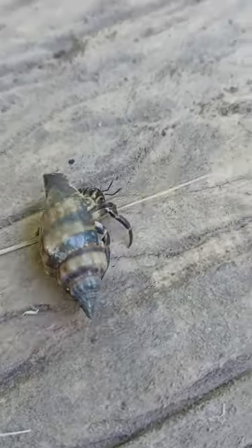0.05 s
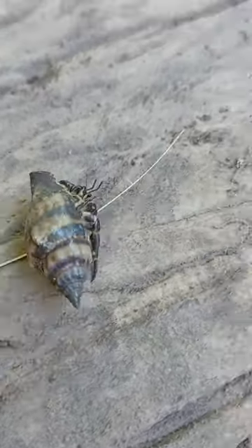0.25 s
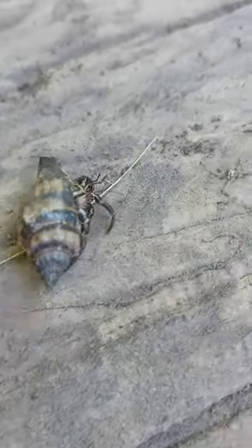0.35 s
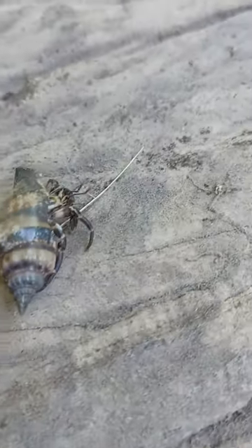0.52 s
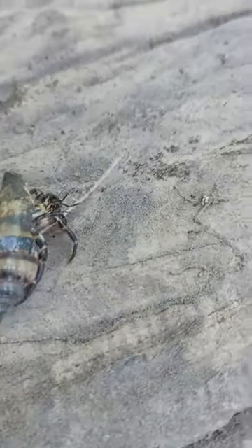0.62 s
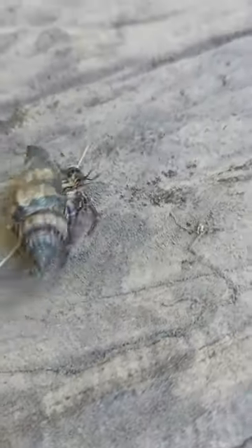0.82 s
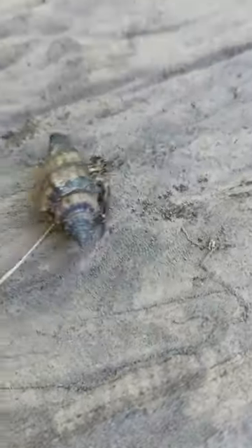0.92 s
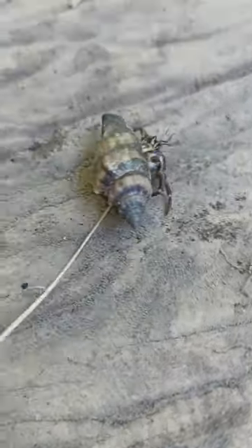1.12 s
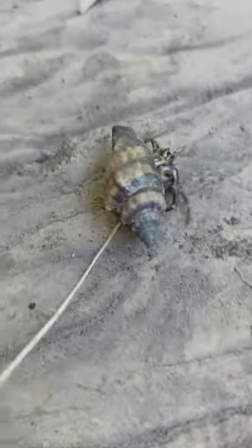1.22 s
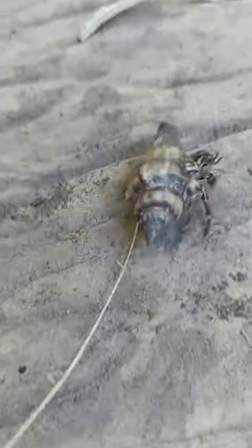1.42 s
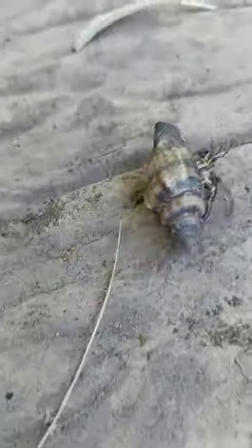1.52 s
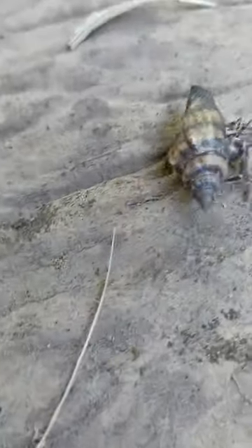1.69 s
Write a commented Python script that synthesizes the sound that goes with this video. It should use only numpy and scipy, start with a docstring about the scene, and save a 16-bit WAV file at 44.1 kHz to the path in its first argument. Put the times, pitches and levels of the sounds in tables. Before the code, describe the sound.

Two short, hollow knocks sound close by as a hermit crab's shell hits a hard surface, the second harder, followed by light ticks of its legs. Behind them are quiet outdoor air, a high insect hiss and faint, far chirps.

```python
"""Quiet outdoor air and a steady treble hiss of insects sound from the start, with three faint, far chirps. At
about 0.2 s a small crab's shell knocks on a hard, hollow-sounding surface close by: the impulse gives a short
thump with quick echoes and excites ringing modes and a dense dying ring. Near 0.8 s it knocks again, a little
louder and brighter, struck at another spot. From about 1.3 s its legs tick faintly."""
import sys
import numpy as np
from scipy.fft import rfft, irfft, next_fast_len
from scipy.io import wavfile
from scipy.ndimage import map_coordinates

SR = 44100
rng = np.random.default_rng(int(sys.argv[2]) if len(sys.argv) > 2 else 0)


def log_audio(samples):
    """Write samples as a 16-bit WAV file to the path given in sys.argv[1]."""
    # one column per channel
    frames = np.atleast_2d(samples).T
    # limit to full scale, then quantise
    limited = np.clip(frames, -1, 1)
    pcm = np.round(limited * 32767).astype(np.int16)
    wavfile.write(sys.argv[1], SR, pcm)


N = 77175


def amp(db):
    """Amplitude ratio of a level in decibels."""
    return 10 ** (np.asarray(db) / 20)


def unit(x):
    """Normalisation to rms 1."""
    return x / np.sqrt(np.mean(x ** 2) + 1e-20)


def along(points, hz):
    """Interpolation of (frequency, value) points on a logarithmic frequency axis."""
    frequencies, values = np.transpose(points)
    return np.interp(np.log(hz + 1), np.log(frequencies + 1), values)


def spectrum(points):
    """Spectral envelope: a gain curve through (frequency, level) points."""
    return lambda hz: amp(along(points, hz))


def since(start_s):
    """Seconds elapsed since an onset, zero before it."""
    return np.maximum(np.arange(N) / SR - start_s, 0)


def wobble(rate_hz):
    """Smooth random modulation: a spline through rate_hz random values a second."""
    return map_coordinates(rng.standard_normal(N // 10), [np.arange(N) * rate_hz / SR], mode="wrap")


def filtered(x, response):
    """Zero-phase filtering: the spectrum of x times a frequency response."""
    size = next_fast_len(N + SR // 2)
    return irfft(rfft(x, size) * response(np.fft.rfftfreq(size, 1 / SR)), size)[..., :N]


def pan(left_minus_right_db):
    """Interaural level difference as left and right gains."""
    return amp(np.array([[.5], [-.5]]) * left_minus_right_db)


def noise(gain, coherence=None):
    """Stereo noise of rms 1; the balance of mid and side sets its interaural coherence."""
    def mid_side_gains(hz):
        angle = np.arccos(np.clip(along(coherence, hz), -1, 1) if coherence else 0 * hz) / 2
        return gain(hz) * np.array([np.cos(angle), np.sin(angle)])
    mid, side = filtered(rng.standard_normal((2, N)), mid_side_gains)
    return unit(np.array([mid + side, mid - side]))


# Spectrum of the air: frequency_hz, relative_db
AIR_SPECTRUM = [(15, -63), (25, -46), (43, -31), (69, -2), (241, -1), (276, -4), (378, -7.5), (454, -8),
                (497, -8), (936, -15), (2070, -18), (2590, -16), (5600, -23), (7280, -57), (12300, -120)]
# Likeness of the air at the two ears: frequency_hz, coherence
AIR_COHERENCE = [(60, 0.55), (290, 0.42), (700, 0.21), (1500, 0)]


def air(level_db=-59.5, cutoff_hz=6200):
    """Ambient noise: a low-passed outdoor rumble and rush, partly coherent in the bass."""
    def gain(hz):
        return amp(along(AIR_SPECTRUM, np.minimum(hz, 5500))) / (1 + (hz / cutoff_hz) ** 8)
    return amp(level_db) * noise(gain, AIR_COHERENCE)


# Far calls: start_s, length_s, start_hz, end_hz, level_db
FAR_CALLS = [(.25, .17, 4050, 3700, -71), (1.21, .3, 4350, 2950, -70), (1.7, .1, 4150, 4100, -72)]


def chirps(width_hz=400):
    """Spectral broadening: falling tones times low-passed noise, heard as calls smeared by distance."""
    out = np.zeros((2, N))
    for start_s, length_s, start_hz, end_hz, level_db in FAR_CALLS:
        progress = np.minimum(since(start_s) / length_s, 1)
        pitch_hz = start_hz + (end_hz - start_hz) * progress
        tone = np.sin(2 * np.pi * np.cumsum(pitch_hz) / SR)
        smear = noise(lambda hz: np.exp(-(hz / width_hz) ** 2))
        out += amp(level_db) * np.sin(np.pi * progress) * unit(tone * smear)
    return out


# Hiss of the far insect chorus: frequency_hz, relative_db
CHORUS_SPECTRUM = [(4000, -44), (6000, -7.5), (7000, -4.5), (9500, 1), (10200, -2.5), (10750, -8.5),
                   (11200, -8), (12300, -3.5), (14000, -10), (15700, -13)]
# Stereo balance of the chorus: frequency_hz, left_minus_right_db
CHORUS_PAN = [(7000, -6), (9000, -3), (10200, 9.5), (11500, 13.5), (15000, 9.5)]
# Single insect voices: pitch_hz, width_hz, relative_db, left_minus_right_db
INSECT_VOICES = [(6745, 150, -64, -3), (7600, 160, -65, -7), (7950, 140, -65.5, -5), (8450, 220, -69, -2),
                 (8830, 230, -63, -2), (9200, 180, -68, 2)]


def insects(chorus_db=-61, voices_db=-.5, core_width_hz=30.4, core_db=-5, flutter_db=-.5):
    """Amplitude modulation: narrow noise bands, each with a purer core, flutter over a broad chorus."""
    def band(pitch_hz, width_hz):
        return noise(lambda hz: 1 / (1 + 2 * ((hz - pitch_hz) / width_hz) ** 2))
    chorus = filtered(noise(spectrum(CHORUS_SPECTRUM)), lambda hz: pan(along(CHORUS_PAN, hz)))
    out = amp(chorus_db) * unit(chorus)
    for pitch_hz, width_hz, relative_db, pan_db in INSECT_VOICES:
        voice = unit(band(pitch_hz, width_hz) + amp(core_db) * band(pitch_hz, core_width_hz))
        out += voice * amp(voices_db + relative_db + flutter_db * wobble(rate_hz=40)) * pan(pan_db)
    return out


# Likeness of contact noise at the two ears: frequency_hz, coherence
CONTACT_COHERENCE = [(150, 1), (400, 1), (1200, 0.27), (3000, 0.15), (9000, 0.1)]


def burst(points, start_s, level_db, t60_s):
    """Exponential decay: contact noise starts abruptly and falls 60 dB in t60_s."""
    t = since(start_s)
    return noise(spectrum(points), CONTACT_COHERENCE) * amp(level_db - 60 * t / t60_s) * (t > 0)


def brighten(x, brightness_db, edge_hz=1760):
    """Shelving filter: half of brightness_db below the edge, one and a half times it above."""
    return filtered(x, lambda hz: amp(brightness_db * (1.5 - 1 / (1 + (hz / edge_hz) ** 6))))


# Spectrum of a leg tap: frequency_hz, relative_db
TAP_SPECTRUM = [(150, -22), (450, -12), (700, -2), (1100, 1), (1500, -7), (4000, -12), (12000, -22)]
# Leg taps: start_s, unfiltered_level_db, brightness_db
LEG_TAPS = [(1.291, -55, -18), (1.383, -53, 1), (1.559, -69, -8), (1.656, -55, -10), (1.703, -53.5, -1.5)]


def legs():
    """Impact transients: light, quickly damped taps as the crab walks on."""
    return sum(brighten(burst(TAP_SPECTRUM, start_s, level_db, t60_s=0.042), brightness_db)
               for start_s, level_db, brightness_db in LEG_TAPS)


# Direct sound and early echoes of the thump: delay_s, relative_db
THUMP_PATHS = [(0, 0), (.00495, -7), (.0138, -2.5), (.0348, -14)]


def thump(centre_s, width_s=0.00037, level_db=-12.5):
    """Early reflections: the contact's one-cycle pressure pulse, then its delayed copies."""
    def pulse(phase):
        return phase * np.exp(.5 - phase ** 2 / 2)
    t = np.arange(N) / SR - centre_s
    return amp(level_db) * sum(amp(db) * pulse((t - delay_s) / width_s) for delay_s, db in THUMP_PATHS)


# Resonances of the surface: pitch_hz, relative_db, t60_s
SURFACE_MODES = [(106.4, -34.5, 0.33), (146.8, -25.5, 0.15), (209, -18.5, 0.17), (245.7, -36.5, 0.34),
                 (311, -34, 0.27), (374.6, -28, 0.18), (415.5, -27, 0.17), (499, -20, 0.094),
                 (602, -22.5, 0.17), (691, -54, 0.093), (737, -25, 0.16), (803.5, -20, 0.098),
                 (1094, -36, .12), (1130, -31, 0.18), (1448.4, -23, 0.065), (1574, -27, 0.042),
                 (1655, -32.5, 0.092), (1822, -40.5, 0.19)]
# Small, bright resonances of the shell: pitch_hz, relative_db, t60_s
SHELL_MODES = [(1480, -25, .035), (2790, -42, .18), (2913, -44, .17), (3260, -48, .12), (4220, -44, .05),
               (4550, -52, .1)]


def modes(start_s, level_db=-1.5, attack_s=0.0026, spread_rad=0.64):
    """Modal superposition: damped sinusoids of surface and shell, out of step between the ears."""
    t, out = since(start_s), np.zeros((2, N))
    for k, (pitch_hz, relative_db, t60_s) in enumerate(SURFACE_MODES + SHELL_MODES):
        ear_phase = spread_rad * rng.standard_normal() * min(pitch_hz / 500, 1) * np.array([[1], [-1]])
        decay = amp(relative_db - 60 * t / t60_s)
        out += (-1) ** k * decay * np.sin(2 * np.pi * pitch_hz * t + ear_phase)
    return amp(level_db) * out * (1 - np.exp(-t / attack_s))


# Spectrum of the dense ring: frequency_hz, relative_db
RING_SPECTRUM = [(30, -30), (70, -20), (130, -8), (300, -3), (550, 0.24), (820, -1), (980, -10), (1150, -7),
                 (1600, -7), (1850, -9), (2100, -18), (3000, -17), (4800, -27), (9000, -31), (15000, -40)]
# Decay of the ring by band: centre_hz, t60_s
RING_DECAY = [(100, 0.63), (250, 0.27), (600, 0.19), (1500, 0.14), (4000, 0.17), (12000, 0.067)]


def ring(start_s, tail_db, level_db=-24, attack_s=0.00092, tail_t60_s=0.55):
    """Modal overlap: weak modes and reflections merge into noise, dying band by band over a faint tail."""
    t = since(start_s)
    dense = noise(spectrum(RING_SPECTRUM), CONTACT_COHERENCE)
    out = amp(tail_db - 60 * t / tail_t60_s) * noise(spectrum(RING_SPECTRUM))
    for centre_hz, t60_s in RING_DECAY:
        band_weights = [(hz, hz == centre_hz) for hz, _ in RING_DECAY]
        band = filtered(dense, lambda hz: along(band_weights, hz))
        out += band * amp(level_db - 60 * t / t60_s)
    return out * (1 - np.exp(-t / attack_s))


# Spectrum of the contact's crack: frequency_hz, relative_db
CRACK_SPECTRUM = [(800, 5), (2500, -10.5), (5000, 5), (9000, -4), (15000, 1.5)]
# Spectrum of the treble sizzle: frequency_hz, relative_db
SIZZLE_SPECTRUM = [(3000, -26), (9500, -11), (12200, 6), (14500, -4), (15700, -4.5)]
# Colour added per unit of strike placement: frequency_hz, gain_db
PLACEMENT_COLOUR = [(750, -0.5), (1000, 1), (1200, -2.5), (1450, 0), (1750, 0.5), (2800, 4), (3750, -0.5),
                    (4300, 3.5), (7000, 1), (12000, 1)]
# Stereo balance of the knocks: frequency_hz, left_minus_right_db
KNOCK_BALANCE = [(150, -0.2), (400, -3.5), (1400, -3.5), (2800, 1), (5000, -5.5), (8000, -13), (12000, 11)]
# Knocks of the shell: start_s, gain_db, placement, sizzle_offset_db, tail_db
SHELL_KNOCKS = [(0.2141, -0.7, -1.13, -5, -44), (0.7864, 0.83, 1, -1.5, -42.5)]


def knocks(contact_delay_s=0.00088, sizzle_db=-43, low_cut_hz=89):
    """Impulse excitation: the shell strikes the surface, each blow at its own spot, which shifts its colour."""
    out = np.zeros((2, N))
    for start_s, gain_db, placement, sizzle_offset_db, tail_db in SHELL_KNOCKS:
        contact_s = start_s + contact_delay_s
        crack = burst(CRACK_SPECTRUM, contact_s, level_db=-38, t60_s=0.021)
        body = thump(contact_s) + crack + modes(start_s) + ring(start_s, tail_db)
        coloured = filtered(body, lambda hz: amp(placement * along(PLACEMENT_COLOUR, hz)))
        sizzle = burst(SIZZLE_SPECTRUM, contact_s, sizzle_db + sizzle_offset_db, t60_s=0.2)
        out += amp(gain_db) * (coloured + sizzle)
    high_pass = lambda hz: hz ** 3 / np.hypot(hz ** 3, low_cut_hz ** 3)
    return filtered(out, lambda hz: high_pass(hz) * pan(along(KNOCK_BALANCE, hz)))


def scene():
    """Linear superposition: the crab in front, insects, far calls and air all around."""
    return knocks() + legs() + insects() + chirps() + air()


def record(dry):
    """Soft saturation rounds the loudest peaks; a low-pass filter then limits the bandwidth."""
    peak_limit, top_hz = 0.34, 15760
    rounded = dry / (1 + (dry / peak_limit) ** 6) ** (1 / 6)
    return filtered(rounded, lambda hz: hz < top_hz)


dry = scene()
out = record(dry)
log_audio(out)
```